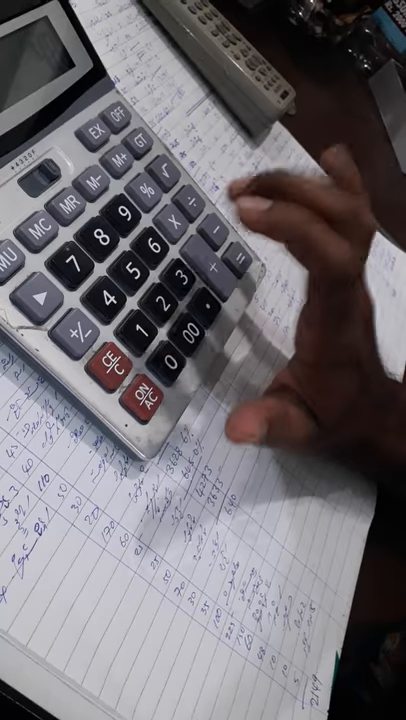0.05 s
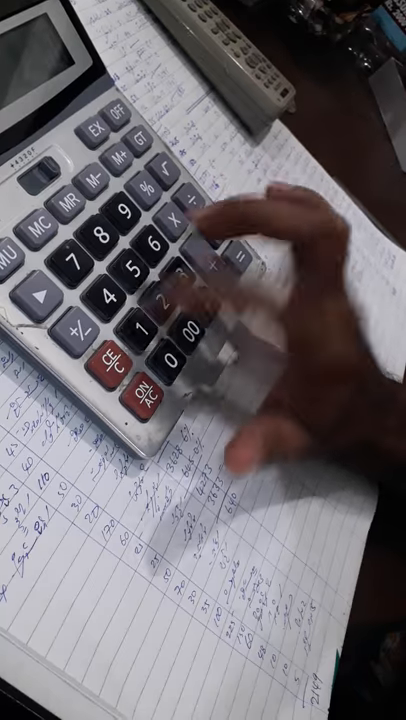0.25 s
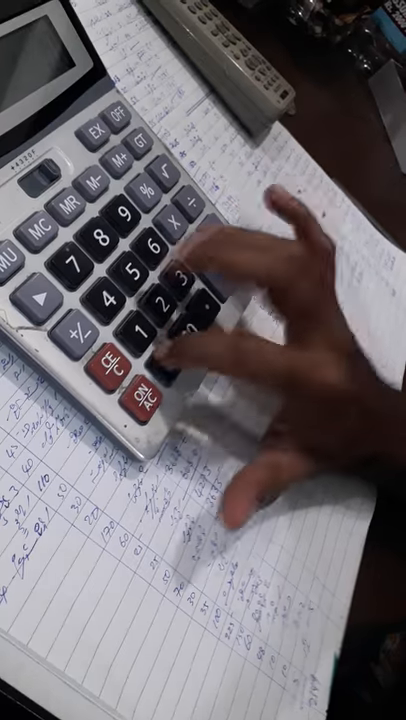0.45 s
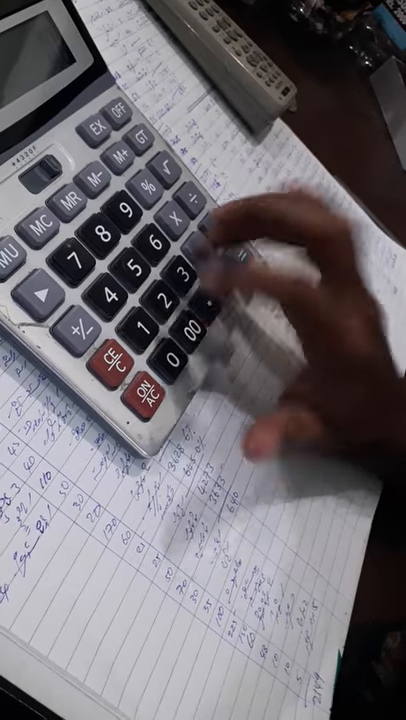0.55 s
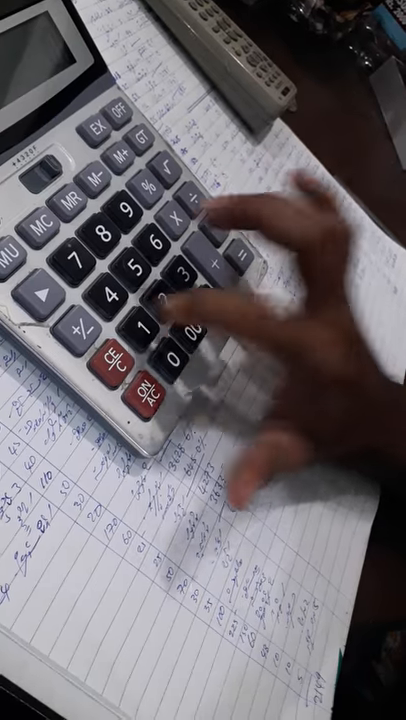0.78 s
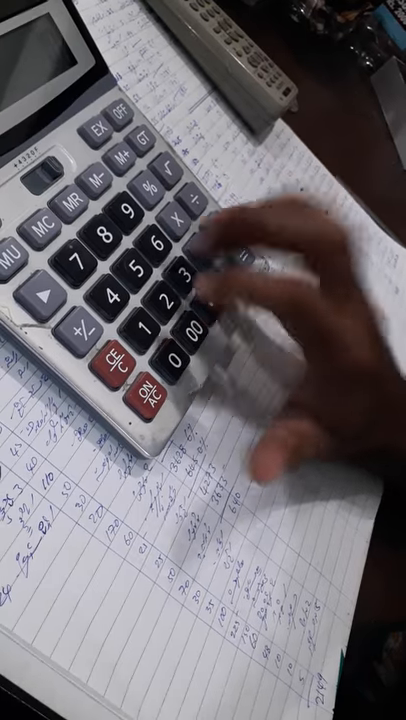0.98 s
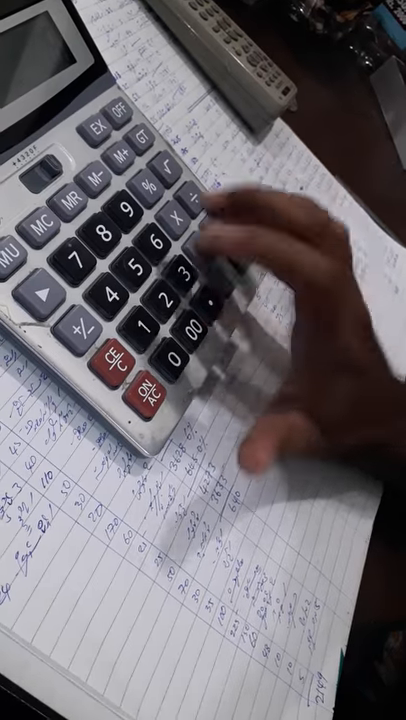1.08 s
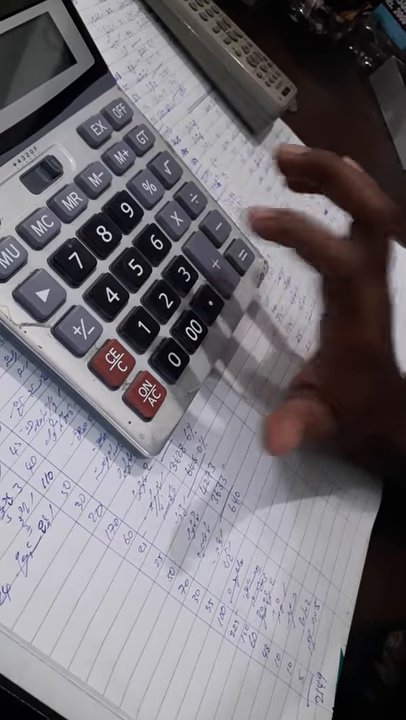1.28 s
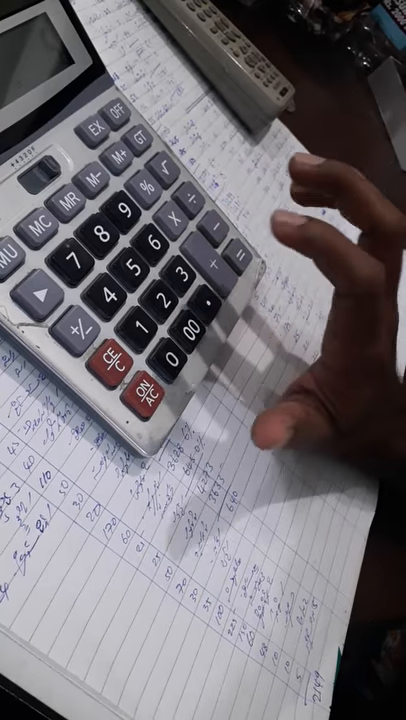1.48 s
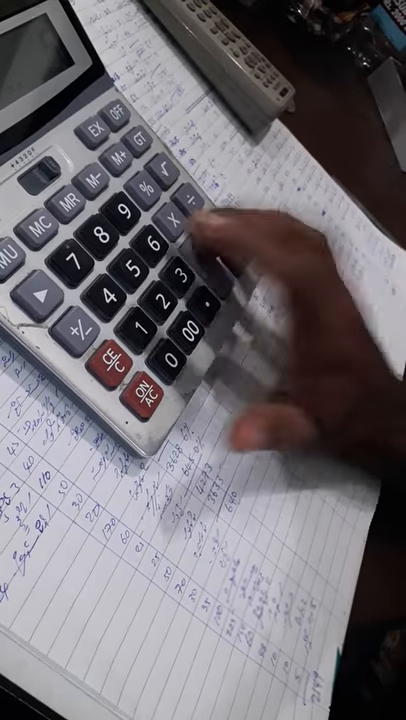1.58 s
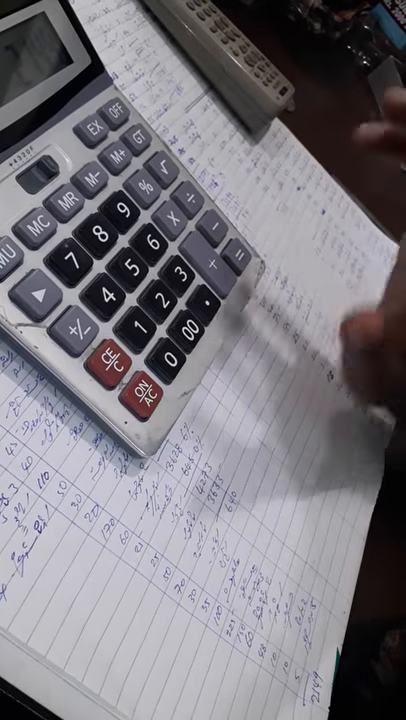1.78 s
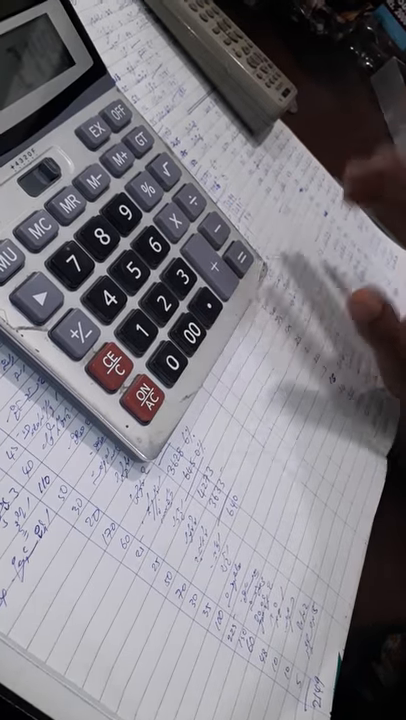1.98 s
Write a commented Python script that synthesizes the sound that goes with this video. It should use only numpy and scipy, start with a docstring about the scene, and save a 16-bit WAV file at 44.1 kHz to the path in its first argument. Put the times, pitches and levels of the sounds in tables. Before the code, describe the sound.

Fingers tap rapidly on a desk calculator, each key clicking down and up against its hollow plastic case, with a final press after a short gap. A close hand-held microphone also catches soft bumps and a quiet room's faint, raspy hum.

```python
"""Tapping on a desk calculator

Two fingers tap quickly on a calculator lying on a paper ledger, close to a hand-held phone.
Each stroke and release is an impact that rattles a plastic key cap, excites the modes of the hollow
case and gives a bright tick. Behind it a quiet room hums, something (perhaps a fan) rasps in an
uneven beat, and the hand rumbles softly on the phone."""
import sys
import numpy as np
from scipy import signal
from scipy.fft import rfft, irfft
from scipy.io import wavfile

SR = 44100
rng = np.random.default_rng(int(sys.argv[2]) if len(sys.argv) > 2 else 0)


def transcribe(signal):
    """Save signal, clipped to [-1, 1], as a 16-bit WAV file at the path in sys.argv[1]."""
    frames = np.atleast_2d(signal).T
    limited = np.clip(frames, -1, 1)
    pcm = np.round(limited * 32767).astype(np.int16)
    wavfile.write(sys.argv[1], SR, pcm)


N = 90404
CLICK_T = np.arange(SR // 20) / SR  # time axis of one click, in seconds
CAP_LEFT_DB, CAP_LAG_S = -12, .00026  # a cap is fainter on the left and arrives later on the right
RATTLE_RISE_S = 0.0002


# Each row: start of a stroke or release in seconds, cap pitch in Hz, cap level in dB, case pitch in Hz,
# levels of case, deck, crack and tick in dB, rattle decay time in milliseconds.
KEY_IMPACTS = [(0.141, 2240, -22.5, 782, -25.5, -30, -29, -39.5, 2.2),
               (0.2178, 2650, -24.5, 740, -46, -36.5, -33.5, -35.5, 0.28),
               (0.3147, 2330, -25, 654, -37.5, -37.5, -34.5, -39, 3.3),
               (0.3743, 2330, -31, 750, -42.5, -41, -45, -34, 2.5),
               (.4542, 2200, -32.5, 623, -48, -42, -53, -45, 1.2),
               (.459, 2470, -33.5, 637, -39.5, -46.5, -45, -40.5, 0.66),
               (0.4899, 2080, -36, 910, -45, -45, -51, -60, 0.73),
               (.527, 2400, -29, 874, -45, -40, -57, -35, 0.63),
               (0.6024, 2380, -22, 768, -26.5, -26.5, -32, -38, 1.9),
               (0.6811, 2440, -20, 736, -30.5, -41, -24, -28, 1.14),
               (0.745, 2400, -26.5, 737, -33.5, -40, -41, -43.5, 2.3),
               (0.7973, 2310, -24.5, 674, -40.5, -37.5, -39, -32.5, 0.41),
               (0.88, 2270, -19.5, 670, -36.5, -49, -34, -30, 1.7),
               (0.9511, 2200, -25, 690, -45, -36, -43, -36, 0.74),
               (1.031, 2240, -22, 794, -23.5, -25.5, -25.5, -32.5, 1.6),
               (1.1063, 2260, -28.5, 740, -38.5, -46, -42, -38.5, 0.24),
               (1.1747, 2166, -19, 813, -32, -49, -24.5, -33, 0.38),
               (1.2286, 2660, -28, 855, -36.5, -42, -48, -30, 1.2),
               (1.6139, 2510, -15.5, 789, -22.5, -24.5, -19, -30, 1.08),
               (1.6731, 2570, -21, 744, -35, -62, -44, -30, 0.68)]
def keys():
    """Superposition: each impact sounds cap, case, deck and tick, at two spaced microphones."""
    left, right = out = np.zeros((2, N))
    case_lag_s, touch_s = .00007, 0.0034
    for at, cap_hz, cap_db, case_hz, case_db, deck_db, crack_db, tick_db, rattle_ms in KEY_IMPACTS:
        rattle_s = rattle_ms / 1000
        cap = key_cap(cap_hz, cap_db, crack_db, rattle_s)
        case, deck = case_and_deck(case_hz, case_db, deck_db, rattle_s)
        tick_left, tick_right = tick(tick_db, rattle_s)
        add(left, cap * undb(CAP_LEFT_DB) + case + deck, at)
        add(left, tick_left, at - CAP_LAG_S)
        add(right, cap, at + CAP_LAG_S)
        add(right, case * undb(-5) + deck, at + case_lag_s)
        add(right, tick_right, at)
        add(right, undb(-13) * fingertip_brush(cap_hz, cap_db, tick_db, touch_s), at - touch_s)
    return out


# Modes of a key cap. Each row: ratio to the cap pitch, relative level in dB, T60 in seconds.
CAP_RESONANCES = [(.81, -11.5, 0.013), (.9, -3.5, 0.012), (0.998, 2, 0.011), (1.13, -3, 0.0052)]
# Modes of the cap's stop. Each row: frequency in Hz, relative level in dB, T60 in seconds.
STOP_RESONANCES = [(2835, 0.5, 0.0061), (3250, -3.5, 0.0076), (3814, -8.5, .011)]
def key_cap(hz, cap_db, crack_db, rattle_s):
    """Impact excitation: the cap rings in its modes and cracks against its stop."""
    cap = ring(contact(rattle_s, rattle_gain=0.35), CAP_RESONANCES, hz)
    crack = ring(rattle(rattle_s), STOP_RESONANCES)
    return click_level(cap, cap_db) + click_level(crack, crack_db)


# Modes of the case. Each row: ratio to the case pitch, relative level in dB, T60 in seconds.
CASE_RESONANCES = [(.78, -11.5, 0.025), (1.003, -2, 0.037), (1.2, -9, 0.032)]
# Modes of the deck. Each row: frequency in Hz, relative level in dB, T60 in seconds.
DECK_RESONANCES = [(1010, -2.5, 0.005), (1355, -0.5, 0.018), (1596, 2.5, 0.0093), (2096, -1, 0.014)]
def case_and_deck(hz, case_db, deck_db, rattle_s):
    """Resonance: one knock drives both the hollow case and the deck under the keys."""
    knock = contact(rattle_s, rattle_gain=0.61)
    case = ring(knock, CASE_RESONANCES, hz)
    deck = ring(knock, DECK_RESONANCES)
    return click_level(case, case_db), click_level(deck, deck_db)


# Spectrum of the tick at each microphone. Each row: frequency in Hz, relative level in dB.
TICK_LEFT_SPECTRUM = [(1500, 1.5), (3000, -3), (5000, 7.5), (6500, 4.5), (8400, 12), (10000, 0),
                      (13000, -6), (16000, 0)]
TICK_RIGHT_SPECTRUM = [(1500, 1.5), (3000, 2), (5000, 4), (6500, 2.5), (8000, -9.5), (9700, 9),
                       (12500, -2.5), (16000, -14)]
def tick(db, rattle_s):
    """A brief contact has a broad spectrum: a bright tick, partly coherent between the two sides."""
    shared, left_only = (rattle(1.62 * rattle_s) for _ in range(2))
    left = colour(shared + left_only, TICK_LEFT_SPECTRUM)
    right = colour(shared, TICK_RIGHT_SPECTRUM)
    return click_level(left, db), click_level(right, db)


def fingertip_brush(cap_hz, cap_db, tick_db, touch_s):
    """Friction: the fingertip brushes the key just before the impact."""
    touch = rattle(touch_s)
    cap = click_level(ring(touch, CAP_RESONANCES, cap_hz), cap_db)
    return cap + click_level(colour(touch, TICK_RIGHT_SPECTRUM), tick_db)


# Each row: start in seconds, frequency in Hz, level in dB.
KEY_PINGS = [(.88, 5641, -42), (.9506, 5660, -48), (1.1745, 5260, -40)]
def pings():
    """Free decay of a single mode: some keys add a thin high ping, alike on both sides."""
    out = np.zeros(N)
    for at, hz, db in KEY_PINGS:
        ping = np.sin(2 * np.pi * hz * CLICK_T) * decay(CLICK_T, t60=.014)
        add(out, click_level(ping, db), at)
    return out


# Each row: start in seconds, level in dB.
CAP_BOUNCES = [(.3195, -30.5), (.9545, -29), (1.6215, -44), (1.6245, -35)]
def bounces():
    """Rebound: a loose cap strikes again after a stroke, with a small clack."""
    left, right = out = np.zeros((2, N))
    for at, db in CAP_BOUNCES:
        clack = click_level(ring(rattle(RATTLE_RISE_S), CAP_RESONANCES, hz=2400), db)
        add(left, clack * undb(CAP_LEFT_DB), at)
        add(right, clack, at + CAP_LAG_S)
    return out


def reflections(x, t60, db, treble_db):
    """Diffuse reflection: an exponentially decaying noise tail, independent at each microphone."""
    t = np.arange(SR) / SR
    onset = 1 - np.exp(-(t / 0.001) ** 2)
    wet = []
    for side in x:
        tail = rng.standard_normal(len(t)) * decay(t, t60) * onset
        tail = colour(tail / np.linalg.norm(tail), [(700, -0.2), (2500, -1.3), (7000, treble_db)])
        wet.append(signal.fftconvolve(side, tail)[:N])
    return undb(db) * np.array(wet)


# Each row: time of the peak in seconds, relative level in dB.
RASP_SWELLS = [(0.207, -40), (0.345, -44), (0.425, -42), (0.513, -43), (0.647, -41), (0.73, -44),
               (0.824, -43.5), (0.916, -39.5), (1.134, -42), (1.21, -43), (1.31, -42), (1.397, -41),
               (1.483, -42.5), (1.528, -47), (1.571, -43), (1.702, -44.5), (1.79, -41), (1.834, -43.5),
               (1.875, -44.5), (1.921, -43.5), (2.008, -43.5)]
# Each row: frequency in Hz, relative level in dB.
RASP_SPECTRUM = [(1500, -30.5), (2000, -3), (2600, 3.5), (3720, -2), (4050, -19), (5100, -19), (6200, -36),
                 (9500, -19.5), (15000, -60)]
def rasps():
    """Amplitude modulation: gritty treble noise swells in a quick beat with gaps."""
    t = np.arange(N) / SR
    power = sum((undb(db + 5.5) * gaussian(t - at, width_s=0.0089)) ** 2 for at, db in RASP_SWELLS)
    return np.sqrt(power) * np.array([undb(-8.5) * noise(RASP_SPECTRUM), noise(RASP_SPECTRUM)])


# Bumps, then the rumble's envelope. Each row: time in seconds, level on the left in dB.
HAND_BUMPS = [(0.148, -35), (0.237, -28.5), (0.279, -36.5), (0.47, -31.5), (1.098, -34), (1.18, -33.5),
              (1.47, -32), (1.69, -25), (1.731, -28)]
RUMBLE_ENVELOPE = [(0, -40.5), (.25, -38), (.55, -67), (.95, -64), (1.1, -61), (1.33, -46), (1.48, -39.5),
                   (1.72, -37.5), (1.85, -51), (2.05, -45.5)]
# Each row: frequency in Hz, relative level in dB.
RUMBLE_SPECTRUM = [(24, -47.5), (50, -4.5), (90, 0), (150, 0.5), (260, -16), (3000, -65)]
def handling():
    """Structure-borne sound: the hand bumps and rumbles on the phone, mostly on the left."""
    t = np.arange(N) / SR
    bumps = np.zeros(N)
    for at, db in HAND_BUMPS:
        detune, phase = rng.uniform(-1.12, 1, 2)
        hz = 88.3 * (1 + 0.23 * detune)
        wobble = np.sqrt(2) * np.sin(2 * np.pi * hz * (t - at) + np.pi * phase)
        bumps += undb(db) * wobble * gaussian(t - at, width_s=0.0067)
    envelope = undb(np.interp(t, *np.array(RUMBLE_ENVELOPE).T))
    left = bumps + envelope * noise(RUMBLE_SPECTRUM)
    right = undb(-34) * bumps + undb(-11.5) * envelope * noise(RUMBLE_SPECTRUM)
    return np.array([left, right])


# Spectra of the room's low wash and its hiss. Each row: frequency in Hz, relative level in dB.
WASH_SPECTRUM = [(30, -24), (70, 1), (105, 5.5), (150, 0), (260, 1.5), (320, -3.5), (470, -1), (600, -9),
                 (1100, -7), (1700, -23.5), (4000, -44)]
HISS_SPECTRUM = [(700, -6), (1150, -4.5), (1600, -6), (1950, 1.5), (2500, -4.5), (3100, -1), (4100, -14.5),
                 (6500, -22), (8200, -21.5), (9400, -18), (12000, -29), (16000, -42)]
# Each row: centre frequency in Hz, level on the right in dB.
HUM_LINES = [(101, -53.5), (494, -64.5), (1905, -53.5), (2470, -54.5)]
def room_tone():
    """Ambient noise: a low wash and narrow-band hum coherent on both sides, and incoherent hiss."""
    hz = np.fft.rfftfreq(N, 1 / SR)
    hum, width_hz = np.zeros(N), 20
    for centre_hz, db in HUM_LINES:
        peak = 1 / (1 + (2 * (hz - centre_hz) / width_hz) ** 2)
        hum += level(irfft(rfft(rng.standard_normal(N)) * peak, N), db)
    hiss = undb(-42) * np.array([noise(HISS_SPECTRUM), noise(HISS_SPECTRUM)])
    balance = undb([[-4], [0]])  # left, right
    return undb(-45.5) * noise(WASH_SPECTRUM) + balance * (hiss + hum)


def rattle(decay_s):
    """Chatter of loose plastic: a noise burst of unit energy that rises fast and dies away."""
    envelope = np.exp(-CLICK_T / decay_s) * (1 - np.exp(-CLICK_T / RATTLE_RISE_S))
    burst = rng.standard_normal(len(CLICK_T)) * envelope
    return burst / np.linalg.norm(burst)


def contact(rattle_s, rattle_gain):
    """Contact force: a unit impulse followed by its rattle."""
    return (CLICK_T == 0) + rattle_gain * rattle(rattle_s)


def ring(force, modes, hz=1):
    """Modal response: a force convolved with damped sines that vary a little at each strike."""
    response = np.zeros(len(CLICK_T))
    for k, (ratio, db, t60) in enumerate(modes):
        stray_db, detune = rng.normal(0, [1.15, 0.012])
        wave = np.sin(2 * np.pi * hz * ratio * (1 + detune) * CLICK_T)
        response += (-1) ** k * undb(db + stray_db) * wave * decay(CLICK_T, t60)
    return signal.fftconvolve(force, response)[:len(CLICK_T)]


def decay(t, t60):
    """Exponential damping by 60 dB in t60 seconds."""
    return np.exp(-np.log(1000) * t / t60)


def gaussian(t, width_s):
    """Bell-shaped envelope centred on time zero."""
    return np.exp(-.5 * (t / width_s) ** 2)


def undb(db):
    """Decibels to amplitude ratio."""
    return 10 ** (np.asarray(db) / 20)


def level(x, db):
    """Scaling to an rms level."""
    return x * undb(db) / np.sqrt(np.mean(x ** 2))


def click_level(x, db):
    """Scaling to the rms level of a click's energy spread over 10 ms."""
    return x * undb(db) * np.sqrt(.01 * SR / np.sum(x ** 2))


def colour(x, points):
    """Minimum-phase filter through (Hz, dB) points."""
    size = 4096
    hz, db = np.array(points).T
    grid = np.maximum(np.fft.rfftfreq(size, 1 / SR), 1)
    gain = undb(np.interp(np.log(grid), np.log(hz), db))
    cepstrum = irfft(np.log(gain))
    cepstrum[1:size // 2] *= 2  # folding onto positive time makes the filter causal
    cepstrum[size // 2 + 1:] = 0
    return signal.fftconvolve(x, irfft(np.exp(rfft(cepstrum))))[:len(x)]


def noise(points):
    """Stationary coloured noise of rms 1."""
    return level(colour(rng.standard_normal(2 * N), points)[N:], 0)


def add(out, x, at_s):
    """Superposition of a sound on a track at a given time."""
    i = max(int(at_s * SR), 0)
    out[i:i + len(x)] += x[:max(len(out) - i, 0)]


def scene():
    """Direct sound of the keys and its desk and room reflections add to the background."""
    clicks = keys() + pings() + bounces()
    desk = reflections(clicks, t60=0.047, db=-8, treble_db=-4)
    room = reflections(clicks, t60=0.42, db=-17, treble_db=4)
    return clicks + desk + room + rasps() + handling() + room_tone()


def record(dry):
    """Clipping and band limiting: the phone stops peaks at full scale and cuts above 16 kHz."""
    lowpass = signal.ellip(12, .1, 95, 16000, fs=SR, output="sos")
    return signal.sosfilt(lowpass, np.clip(dry, -1, 1))


dry = scene()
out = record(dry)
transcribe(out)
```